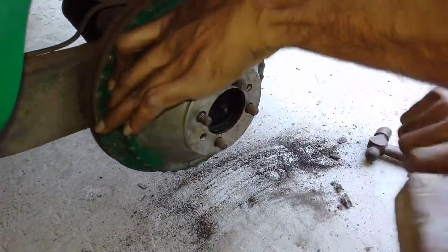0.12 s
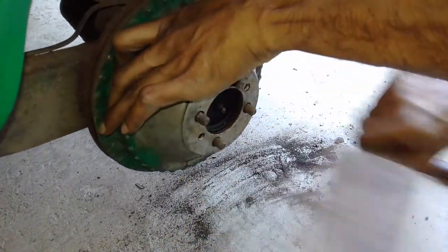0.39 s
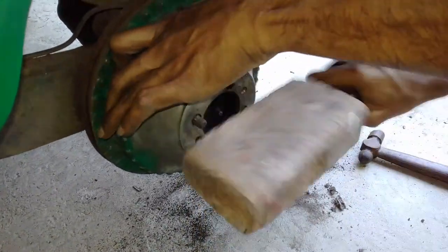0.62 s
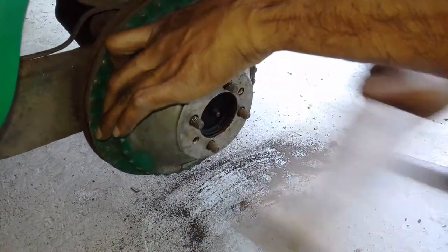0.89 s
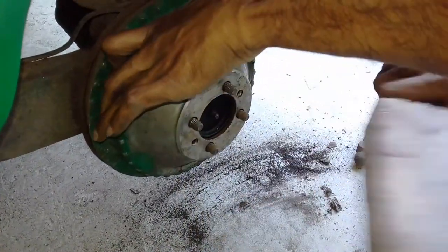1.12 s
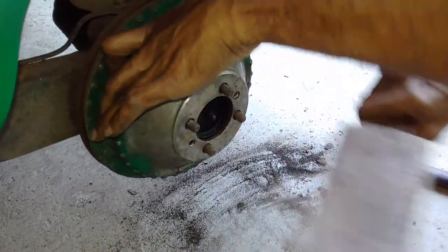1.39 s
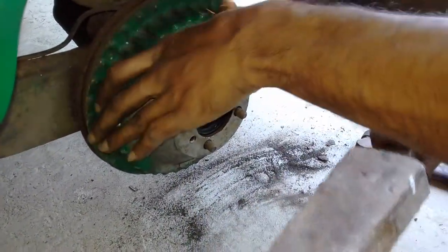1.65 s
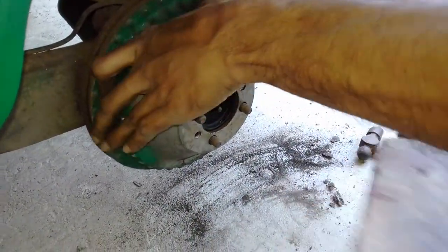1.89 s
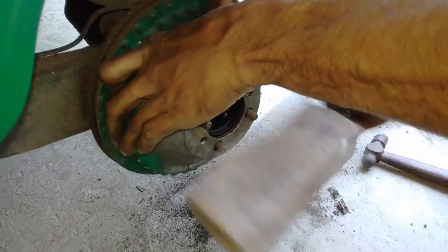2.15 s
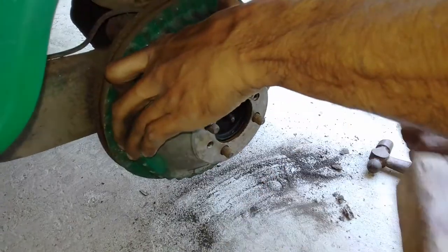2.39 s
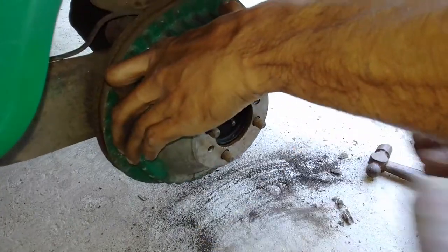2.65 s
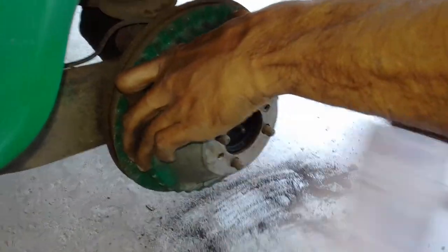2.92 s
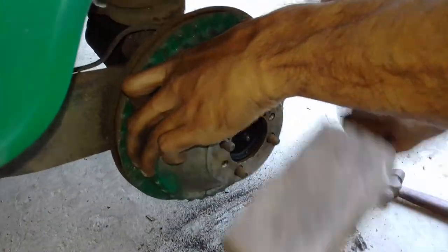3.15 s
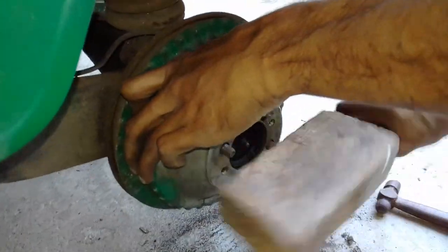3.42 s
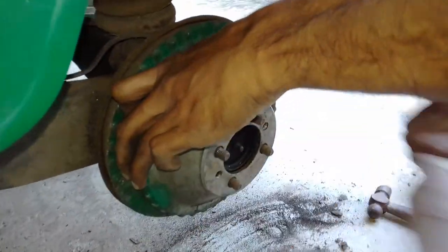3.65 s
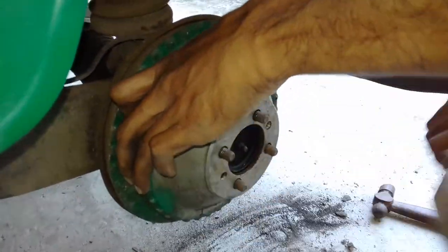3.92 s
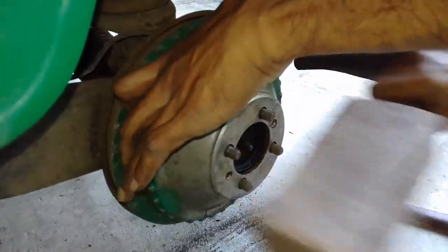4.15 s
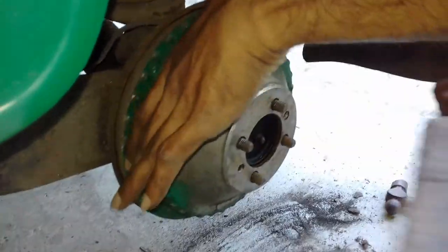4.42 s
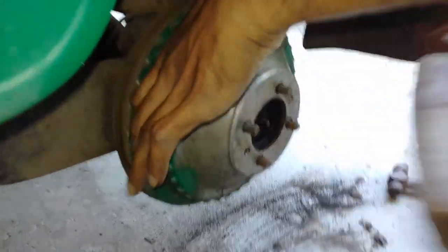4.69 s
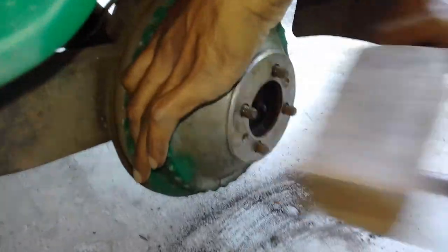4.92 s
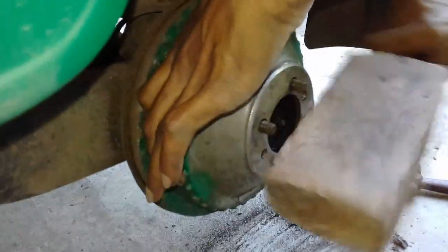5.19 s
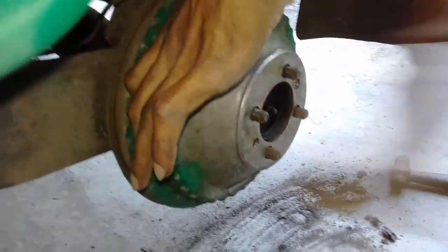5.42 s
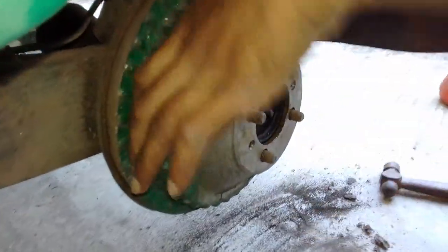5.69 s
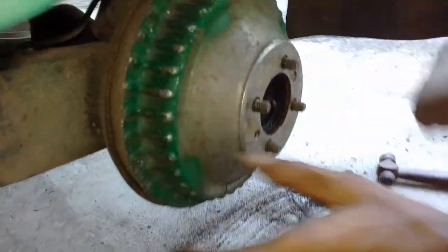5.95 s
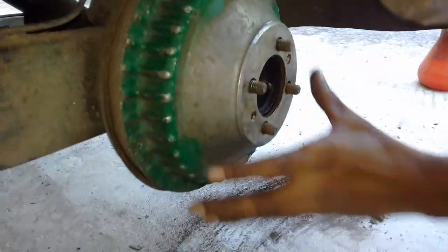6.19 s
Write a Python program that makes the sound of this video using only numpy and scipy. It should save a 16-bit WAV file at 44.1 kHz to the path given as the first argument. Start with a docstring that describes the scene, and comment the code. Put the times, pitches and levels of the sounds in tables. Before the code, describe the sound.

Close to a small microphone in a hard-walled workshop, a wooden block knocks a metal brake drum held under a palm. Five blows come about three per second, then a pause with faint rustling and tiny ticks, seven more blows, a shorter pause, and three last loud ones. Each is a short, woody clonk with loose-part rattle, a dull thud and a faint ring. The end is nearly silent, with a small tick and soft hand rustle.

```python
"""A metal brake drum held in a hand is knocked with a wooden block in three short runs, close to a small microphone.
Each blow sums dying sines for block, damped shell and thud, shaped noise for loose parts and frame, and faint rings.
Soft second bumps follow most blows; noise ticks and rustles follow the hand shifting its grip, over quiet air.
Random echoes of a hard-walled workshop draw out the tail, and the recorder rounds off the loudest peaks."""
import sys
import numpy as np
from scipy import signal
from scipy.fft import rfft, irfft
from scipy.io import wavfile
from scipy.ndimage import uniform_filter1d

SR = 44100
rng = np.random.default_rng(int(sys.argv[2]) if len(sys.argv) > 2 else 0)


def invert_db(x):
    """Field ratio 10**(x/20) for x, a level in decibels (scalar or array-like)."""
    u = np.asarray(x, float) / 20
    return 10 ** u


def master_out(mix):
    """Clip the mix to full scale and print it as 16-bit PCM to the path in sys.argv[1]."""
    frames = np.transpose(np.atleast_2d(mix))
    ceiling = np.clip(frames, -1, 1)
    pcm = np.round(ceiling * 32767).astype(np.int16)
    wavfile.write(sys.argv[1], SR, pcm)


N = 278712  # length in samples
LEAD = 4410  # samples of run-up, so that a blow may begin before time 0

# Blows of the block. Each row: start in seconds, knock level in dB, block's note in Hz,
# rattle over the knock in dB, clank over the knock in dB.
BLOWS = [(-0.016, -6, 1600, -11, -16.5), (0.3312, -4.5, 1420, -12.5, -16.5),
         (0.6609, -1.5, 1895, -10, -16.5), (0.9863, -3.5, 1520, -11.5, -17),
         (1.2913, -2.5, 1872, -12, -15.5), (2.2099, -5, 2025, -10, -14.5), (2.5335, -4, 1853, -12.5, -16),
         (2.8452, 0, 1840, -9.5, -17), (3.1659, -2.5, 1853, -12, -15.5), (3.4728, -2, 1874, -6, -14.5),
         (3.797, 0, 1835, -10, -16.5), (4.1203, -4.5, 1704, -10, -15.5), (4.8865, -2, 1907, -15.5, -17.5),
         (5.1958, 0, 1707, -12, -19.5), (5.4992, -1, 1905, -11, -18)]
# Soft second bumps about 30 ms after a blow, probably wall echoes, with some rattle bursts.
# Each row: start in seconds, knock level in dB, note in Hz, rattle over the knock in dB.
AFTERBUMPS = [(.040, -32.5, 2140, 5), (0.696, -19.5, 1250, -15), (1.014, -24.5, 1500, -6.5),
              (1.32, -24, 800, -17.5), (2.566, -13.5, 965, -15), (2.879, -20.5, 845, -5.5),
              (3.192, -23, 890, -5), (3.524, -35, 2200, 7), (3.825, -13.5, 800, -8.5),
              (4.92, -36.5, 2200, -5), (5.523, -19.5, 1206, -17.5)]
AFTERBUMP_SOFTNESS = 3  # afterbumps rise this many times slower than blows
AFTERBUMP_THUD_DB, AFTERBUMP_CLANK_DB = -10.5, -28.5  # over the knock of the afterbump
# Thud over the knock of a 0 dB blow; for a weaker blow it shrinks less than the knock (dB per dB).
THUD_DB, THUD_LAG = -11, 0.63

# Heavily damped shell under palm and block. Each row: central frequency in Hz, relative level in dB, t60 in seconds.
SHELL_MODES = [(743, 1, 0.041), (890, -2.5, .045), (966, -6.5, 0.066), (1185, -2.5, 0.034),
               (1387, -2.5, 0.044), (1520, -3, .04), (1722, -9, 0.1), (1958, -9.5, 0.06), (1907, -3.5, .04),
               (1263.4, -6.5, 0.046), (2825, -6.5, .035), (3050, -14.5, 0.032), (3490, -14, 0.054),
               (3930, -18.5, 0.015), (4830, -11.5, 0.05)]
# Axle and frame, which carry the thud. Each row: central frequency in Hz, relative level in dB, t60 in seconds.
AXLE_MODES = [(320, -19.5, 0.058), (428.5, -2, 0.05), (502, -5, 0.0083), (648, -7.5, 0.075)]
# Colour of the loose parts. Each row: frequency in Hz, relative level in dB per Hz.
RATTLE_COLOUR = [(1290, -11.5), (2200, -1.5), (3080, -1.5), (3700, -3.5), (5320, -8.5), (5780, -9),
                 (6500, -10.5), (7100, -6.5), (8000, -8.5), (8900, -4), (14700, -29.5), (16000, -32),
                 (16400, -53.5)]
# Colour of the dense frame modes. Each row: frequency in Hz, relative level in dB per Hz.
CLANK_COLOUR = [(35, -52.5), (60, -25.5), (133, -19.5), (192, -11), (356, -7), (437, -3.5), (689, -4),
                (772, 1), (1060, -4.5), (1720, -2.5), (6300, -27), (8870, -20), (14000, -44.5)]
# Quick part of the clank. Each row: frequency in Hz, t60 in seconds.
CLANK_DECAY = [(80, 0.72), (260, 0.46), (700, 0.27), (1840, 0.26), (4850, 0.32), (12800, 0.2)]
# Slow part of the clank. Each row: frequency in Hz, t60 in seconds.
FRAME_DECAY = [(80, 1.2), (260, 0.88), (700, 1.4), (1840, 0.94), (4850, 0.69), (12800, 0.28)]
SAME_FRAME = 0.69  # share of the clank's fine pattern that every knock repeats

# Thin metal rings that outlast the knock. Each row: central frequency in Hz, central level against the knock in dB,
# t60 in seconds.
THIN_RINGS = [(1259, -46, .5), (2789, -53, .45), (2834, -51, .45), (3500, -52, .55), (4387, -43, .2),
              (5719, -50, .25), (5960, -50, .35), (6905, -35, .1), (7447, -55, .4), (7603, -52, .45),
              (8297, -50, .45), (8379, -36, .07), (8478, -50, .45), (8840, -48, .35), (9143, -34, .07),
              (9940, -39, .07), (11065, -60, .3)]
# Hollow bodywork that swells after each blow. Each row: central frequency in Hz, central level against the knock in dB,
# t60 in seconds, time constant of the rise in seconds.
BODYWORK = [(85, -44.5, .8, .09), (204, -24, .25, .04)]
# Rings left free by one grip of the hand. Each row: frequency in Hz, start of grip in seconds, end of grip in seconds,
# central level against the knock in dB, t60 in seconds.
GRIPS = [(1911, -1, 2, -53, 1.5), (2062, 1, 2, -62, 3.3), (3503, 1, 2, -50.5, .8), (1319, 2, 4, -58, 4.),
         (1319, 4, 5.3, -55, 5.), (1319, 5.4, 6, -62, 4.), (533, 5.4, 6, -57, 3.7)]

# Small ticks of the hand shifting. Each row: start in seconds, level in dB, t60 in seconds.
TICKS = [(1.8393, -70, 0.022), (1.9602, -60, 0.032), (5.8775, -48, 0.022)]
# Colour of a tick. Each row: frequency in Hz, relative level in dB per Hz.
TICK_COLOUR = [(1060, -20.5), (1800, 3.5), (4020, 3.5), (5250, -8), (8280, -8), (13600, -13), (16000, -30)]
# Skin and sleeve rustling. Each row: loudest moment in seconds, level in dB, rise in seconds per 20 dB,
# fall in seconds per 20 dB.
BRUSHES = [(1.47, -69, .08, .33), (1.784, -75, .04, .014), (1.962, -70, .01, .02), (4.42, -80, .08, .2),
           (4.714, -76, .25, .18), (6.13, -74, .22, .4), (6.25, -70, .3, .2)]
# Colour of the rustle. Each row: frequency in Hz, relative level in dB per Hz.
RUSTLE_COLOUR = [(1760, -51), (3000, -22.5), (3700, -11.5), (4600, -10.5), (7780, -5.5), (8880, 2),
                 (11100, -7.5), (16000, -28.5)]

# Tail of the floor and near walls. Each row: frequency in Hz, t60 in seconds.
NEAR_WALLS = [(80, .6), (260, 0.48), (700, 0.27), (1840, .24), (4850, 0.27), (12800, 0.34)]
# Tail of the far end. Each row: frequency in Hz, t60 in seconds.
FAR_WALLS = [(80, 1.1), (260, 1.8), (700, 0.86), (1840, 0.69), (4850, 0.86), (12800, 0.27)]
SCATTER_HZ, SCATTER_S = 3000., 1.1  # above this the echoes change as hand and block move, over about this time
# Colour of the quiet air. Each row: frequency in Hz, relative level in dB per Hz.
AIR_COLOUR = [(15, -15.5), (25, 3.5), (49, 1), (95, 0), (223, 4), (335, -6.5), (430, -9.5), (641, 2),
              (1100, -7.5), (2050, -7.5), (2840, -13.5), (9070, -19), (16000, -34)]
AIR_DB = -71


def drum():
    """All blows of block on drum and their soft afterbumps; each blow also leaves rings and a boom of the bodywork."""
    mix = np.zeros(N + LEAD)
    frame = noise(CLANK_COLOUR, SR)
    for s, db, note_hz, rattle_db in AFTERBUMPS:
        bump = knock(frame, db, note_hz, AFTERBUMP_THUD_DB, rattle_db, AFTERBUMP_CLANK_DB, AFTERBUMP_SOFTNESS)
        add(mix, s, bump)
    next_starts = [row[0] for row in BLOWS[1:]] + [2 * N / SR]
    for (s, db, note_hz, rattle_db, clank_db), after in zip(BLOWS, next_starts):
        add(mix, s, knock(frame, db, note_hz, THUD_DB - THUD_LAG * db, rattle_db, clank_db))
        add(mix, s, invert_db(db) * thin_rings())
        add(mix, s, invert_db(db) * bodywork(after - s))
        add(mix, s, invert_db(db) * free_rings(s, after - s))
    return mix


def knock(frame, db, note_hz, thud_db, rattle_db, clank_db, softness=1):
    """Sound of wood on metal: block and shell together with the thud, the loose parts and the frame."""
    t = np.arange(SR) / SR
    contact = t / softness
    shell = block_and_shell(note_hz, t, contact)
    thud = ring(AXLE_MODES, t, spread_db=1.0, detune=0.023) * (1 - np.exp(-contact / 0.001))
    parts = invert_db(thud_db) * thud
    parts += invert_db(rattle_db) * rattle(t, contact)
    parts += invert_db(clank_db) * clank(frame, t, contact)
    return invert_db(db) * (shell / abs(shell).max() + parts)


def block_and_shell(note_hz, t, contact):
    """The block's short note drives the damped shell modes, those near its pitch most."""
    block = invert_db(-0.5 - 60 * t / .03) * np.sin(2 * np.pi * note_hz * t)
    driven = [(hz, db - 6.4 * abs(np.log2(hz / note_hz)), t60) for hz, db, t60 in SHELL_MODES]
    shell = block + ring(driven + driven, t, spread_db=2.0, detune=.01)  # modes come in split pairs
    return shell * (1 - np.exp(-contact / 0.0008)) ** 2  # soft wood spreads the push over its first cycle


def rattle(t, contact):
    """Loose parts inside chatter as fading noise whose level jitters with uneven contacts."""
    chatter = invert_db(2.8 * evened(uniform_filter1d(rng.standard_normal(len(t)), size=70)))
    envelope = invert_db(-60 * t / 0.078) * (1 - np.exp(-contact / 0.0013)) ** 2
    return noise(RATTLE_COLOUR, len(t)) * chatter * envelope


def clank(frame, t, contact):
    """Frame modes too dense to tell apart sound as noise, with a quick and a weaker, mostly slower decay."""
    dense = SAME_FRAME * frame + np.sqrt(1 - SAME_FRAME ** 2) * noise(CLANK_COLOUR, len(t))
    dense *= 1 - np.exp(-contact / 0.01)
    return fading(dense, CLANK_DECAY) + invert_db(-24.5) * fading(dense, FRAME_DECAY)


def thin_rings():
    """Thin metal modes ring faintly on after the knock."""
    t = np.arange(SR) / SR
    return (1 - np.exp(-t / .002)) * ring(THIN_RINGS, t, spread_db=3.0, detune=.0015)


def bodywork(gap_s):
    """Hollow bodywork booms: low modes swell slowly, die away, and are cut by the next blow."""
    t = np.arange(2 * SR) / SR
    cut = np.clip((gap_s - t) / 0.028, 0, 1)
    boom = np.zeros(len(t))
    for hz, db, t60, rise_s in BODYWORK:
        swell = (1 - np.exp(-t / rise_s)) ** 2
        boom += swell * cut * ring([(hz, db, t60)], t, spread_db=2.5, detune=0.01)
    return boom


def free_rings(s, gap_s):
    """Modes that the present grip leaves undamped ring as wavering sines until the next blow stops them."""
    t = np.arange(2 * SR) / SR
    stop = np.clip((gap_s - t) / .003, 0, 1)
    rings = np.zeros(len(t))
    for hz, first, last, db, t60 in GRIPS:
        if first <= s <= last:
            # the palm presses unevenly
            waver_db = 1.6 * evened(uniform_filter1d(rng.standard_normal(len(t)), size=3000))
            rings += invert_db(db + waver_db - 60 * t / t60) * stop * np.sin(2 * np.pi * hz * t)
    return rings


def ring(modes, t, spread_db, detune):
    """Struck modes as dying sines, most starting with a push; where the blow lands changes each mode's share."""
    hz, db, t60 = np.transpose(modes)[:, :, None]
    share, shift, push = rng.standard_normal((3, len(modes), 1))
    level = np.sign(push + 1) * invert_db(db + spread_db * share - 60 * t / t60)
    return (level * np.sin(2 * np.pi * hz * (1 + detune * shift) * t)).sum(0)


def hand():
    """The hand shifting its grip: fading noise ticks, and rustles of grainy noise that swell and fall."""
    mix = np.zeros(N + LEAD)
    t = np.arange(SR // 5) / SR
    for s, db, t60 in TICKS:
        add(mix, s, invert_db(db - 60 * t / t60) * noise(TICK_COLOUR, len(t)))
    at = (np.arange(len(mix)) - LEAD) / SR
    rub = np.zeros(len(mix))
    for s, db, rise_s, fall_s in BRUSHES:
        rub += invert_db(db - 20 * np.maximum((s - at) / rise_s, (at - s) / fall_s))
    grain = invert_db(2.0 * evened(uniform_filter1d(rng.standard_normal(len(at)), size=200)))
    return mix + rub * evened(grain * noise(RUSTLE_COLOUR, len(at)))


def workshop(x):
    """Floor and near walls answer quickly, the far end weaker and longer; treble echoes drift between patterns."""
    low = signal.sosfiltfilt(signal.butter(2, SCATTER_HZ, fs=SR, output="sos"), x)
    turn = np.pi * np.arange(len(x)) / SR / SCATTER_S
    # three treble shares of steady total power, each sent into its own echoes
    moving = [np.sqrt(2 / 3) * np.cos(turn + k * np.pi / 3) * (x - low) for k in range(3)]
    wet = np.zeros(len(x))
    for part in [low] + moving:
        room = invert_db(-14.0) * tail(NEAR_WALLS, .003, 0.0093) + invert_db(-28.0) * tail(FAR_WALLS, 0.015, 0.059)
        wet += signal.fftconvolve(part, room)[:len(x)]
    return x + wet


def tail(decays, start_s, rise_s):
    """Echoes as sparse taps of random sign, fading by band, with total energy 1."""
    count, spacing = SR * 3 // 2, 20  # samples
    taps = np.zeros(count)
    at = np.arange(0, count - spacing, spacing)
    taps[at + rng.integers(0, spacing, len(at))] = rng.choice([-1., 1.], len(at))
    onset = np.clip((np.arange(count) / SR - start_s) / rise_s, 0, 1)
    out = fading(taps * onset, decays)
    return out / np.linalg.norm(out)


def quiet_air():
    """The still air of the workshop as a steady coloured noise."""
    return invert_db(AIR_DB) * noise(AIR_COLOUR, N)


def noise(colour, count):
    """Random motion with a given spectrum, scaled to rms 1."""
    z = rfft(rng.standard_normal(count))
    return evened(irfft(z * invert_db(read(colour, np.fft.rfftfreq(count, 1 / SR))), count))


def fading(x, decays):
    """Lets each frequency band of x die at its own speed."""
    hz, t, z = signal.stft(x, SR, nperseg=512)
    faded = z * invert_db(-60 * t / read(decays, hz)[:, None])
    return signal.istft(faded, SR, nperseg=512)[1][:len(x)]


def evened(x):
    """Scales to rms 1."""
    return x / np.sqrt(np.mean(x ** 2) + 1e-20)


def read(points, hz):
    """Reads a table over log frequency."""
    f, value = np.transpose(points)
    return np.interp(np.log(hz + 1), np.log(f + 1), value)


def add(mix, s, sound):
    """Adds a sound into the mix at time s, allowing for the run-up."""
    part = mix[round(s * SR) + LEAD:][:len(sound)]
    part += sound[:len(part)]


def scene():
    """Drum and hand in the workshop over its quiet air; the small microphone takes up little deep bass of them."""
    bass_cut = signal.butter(4, 110., "high", fs=SR, output="sos")
    near = signal.sosfilt(bass_cut, workshop(drum() + hand()))
    return (near[LEAD:] + quiet_air())[None]


def low_pass(x):
    """Removes everything above the highest recorded frequency."""
    return signal.sosfilt(signal.butter(12, 16540, fs=SR, output="sos"), x)


def record(dry):
    """Peaks bend into a firm ceiling; the recorder then cuts the deepest bass."""
    ceiling = .63  # of full scale
    held = dry / (1 + (dry / ceiling) ** 4) ** (1 / 4)
    thin = signal.sosfilt(signal.butter(2, 60., "high", fs=SR, output="sos"), held)
    return low_pass(thin)


dry = scene()
out = record(dry)
master_out(out)
```